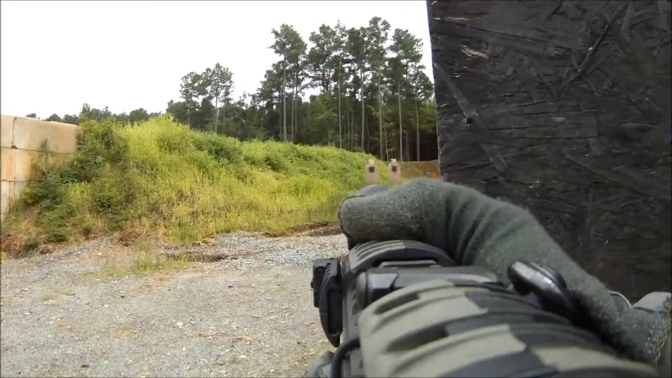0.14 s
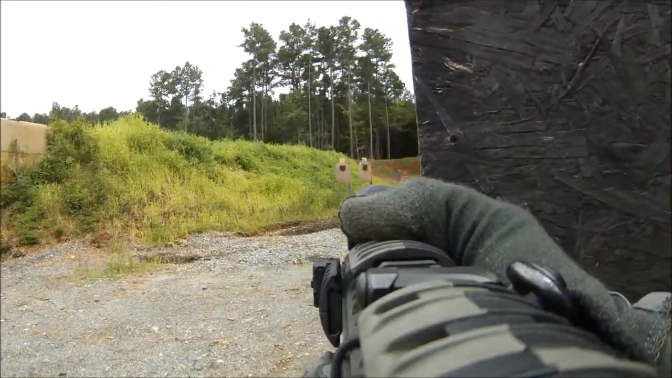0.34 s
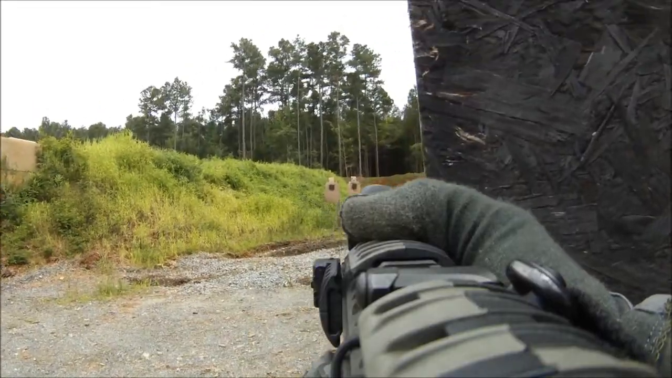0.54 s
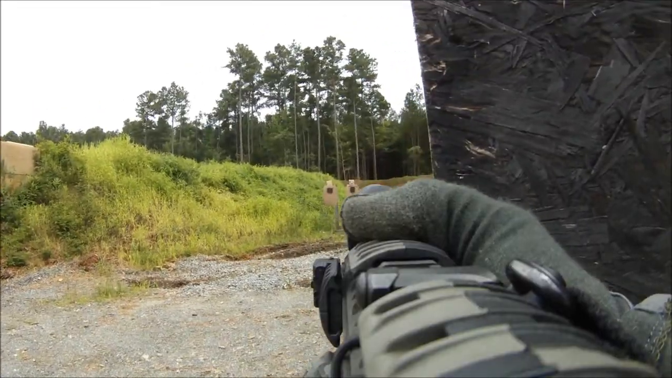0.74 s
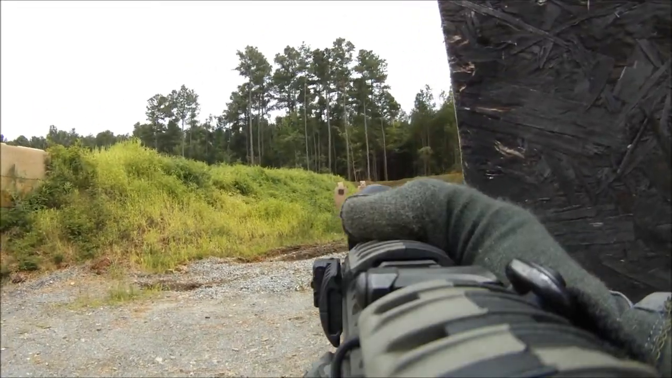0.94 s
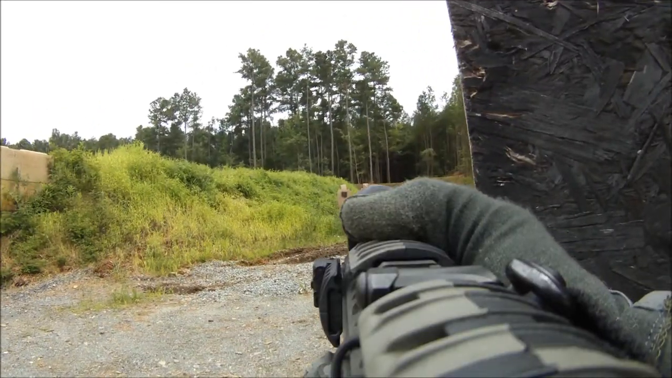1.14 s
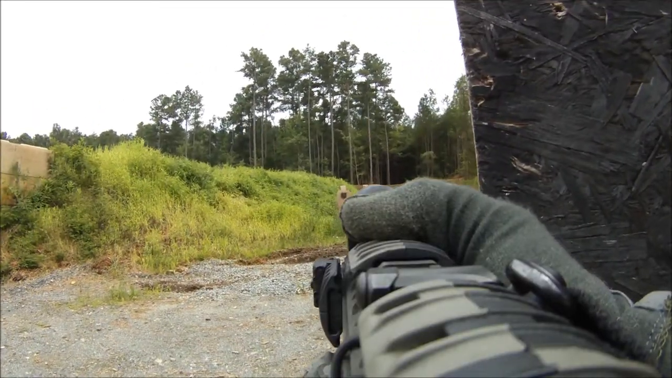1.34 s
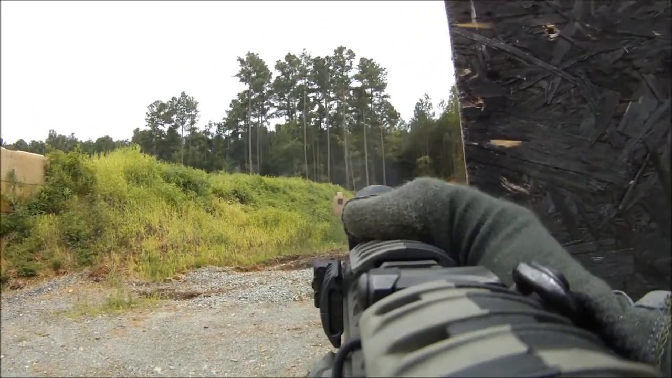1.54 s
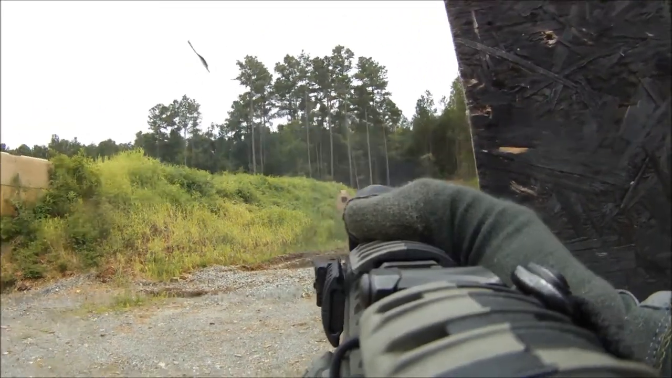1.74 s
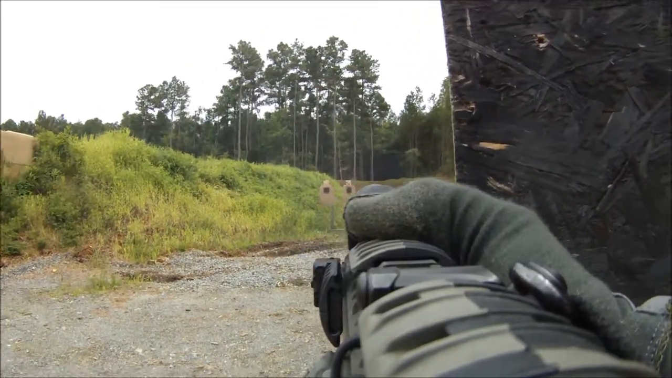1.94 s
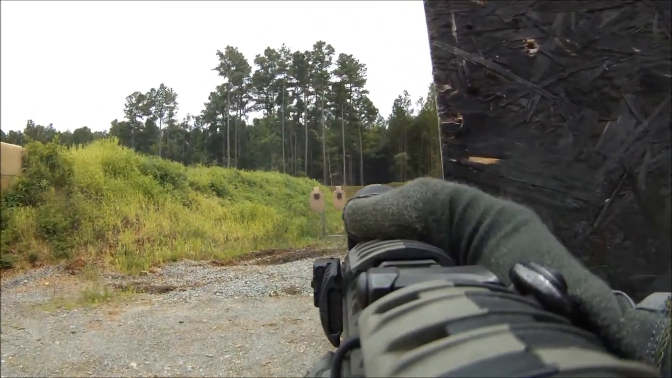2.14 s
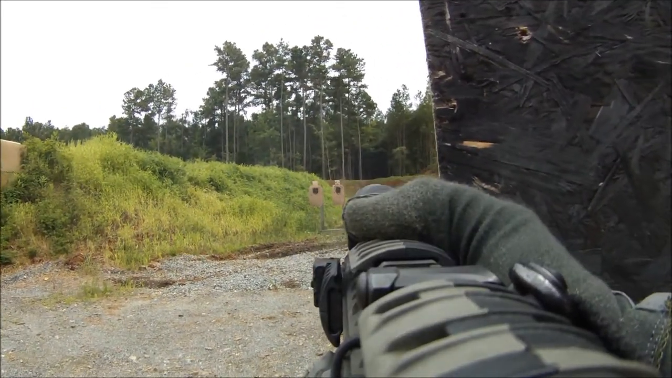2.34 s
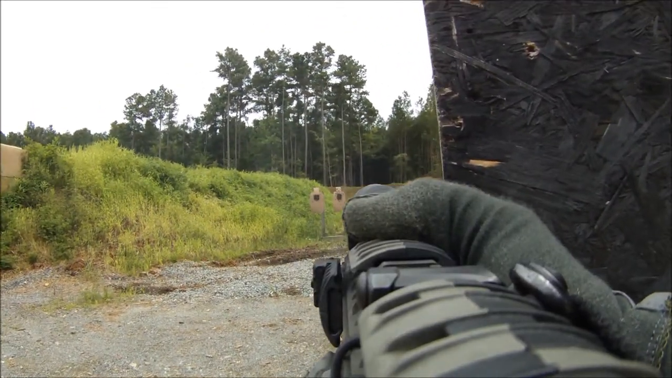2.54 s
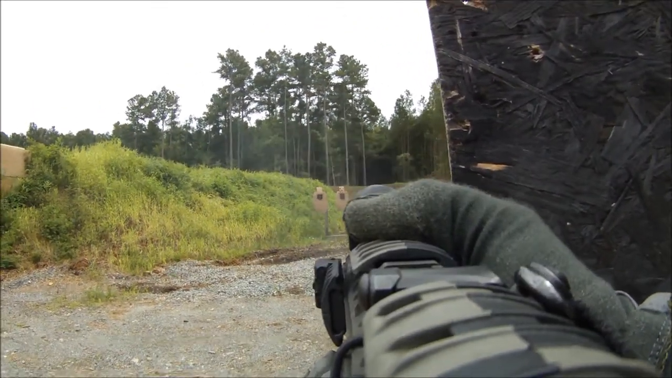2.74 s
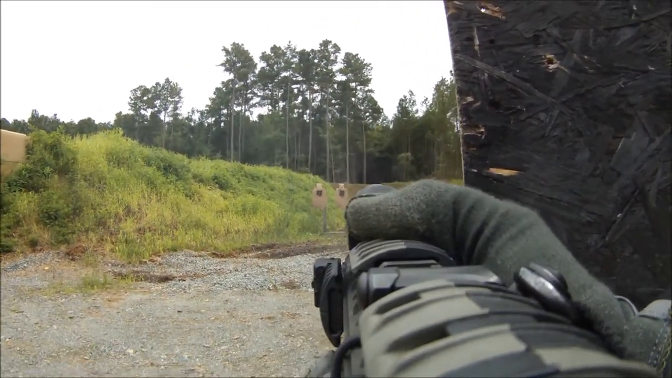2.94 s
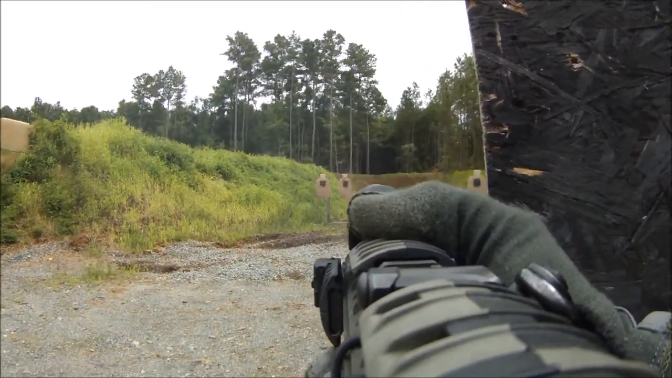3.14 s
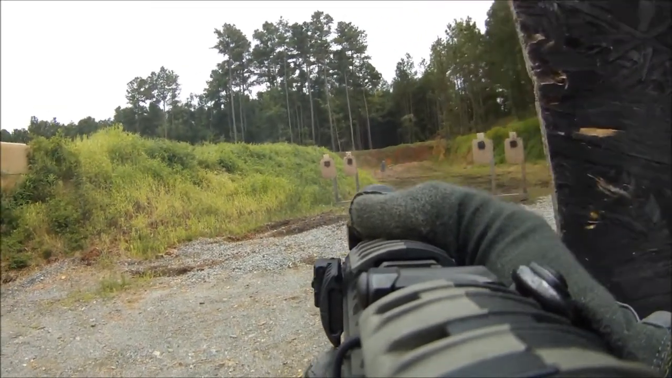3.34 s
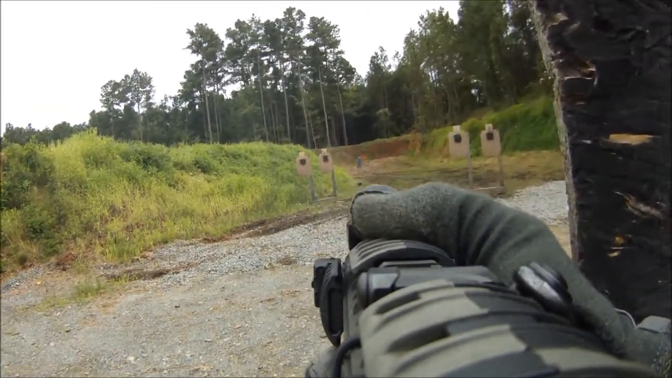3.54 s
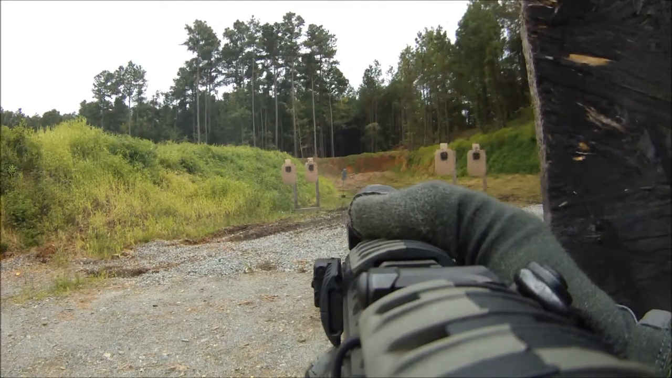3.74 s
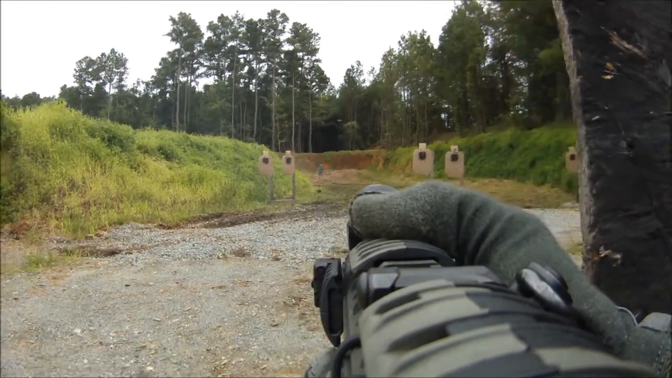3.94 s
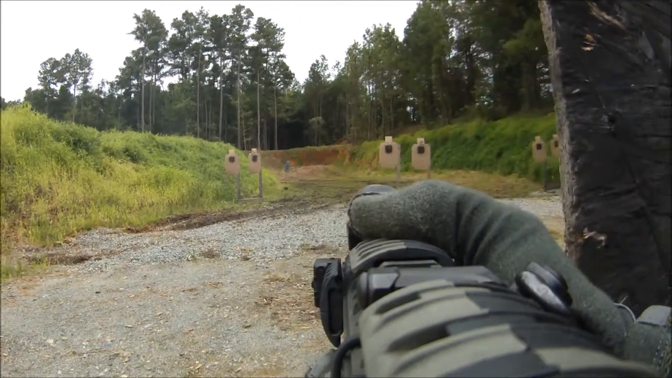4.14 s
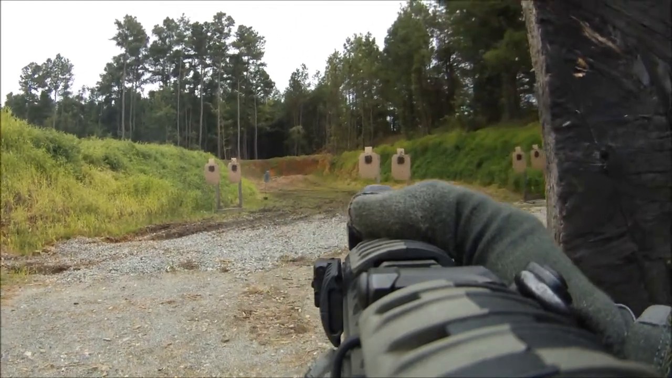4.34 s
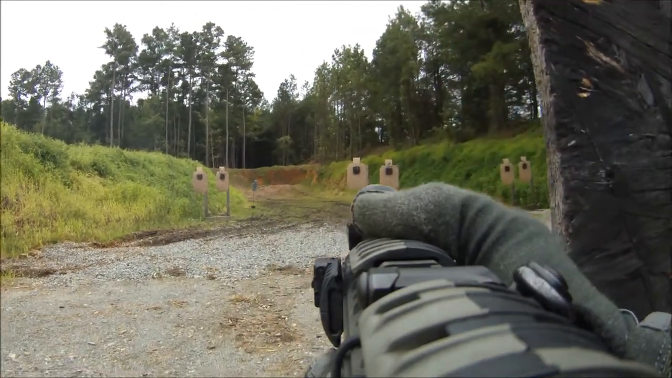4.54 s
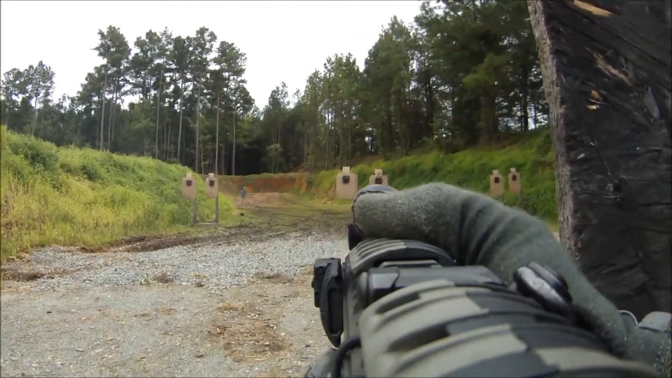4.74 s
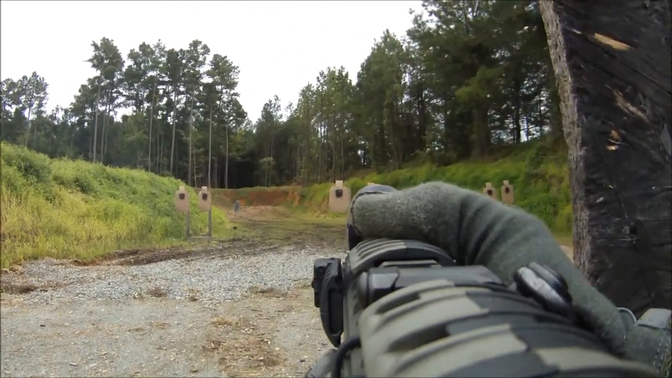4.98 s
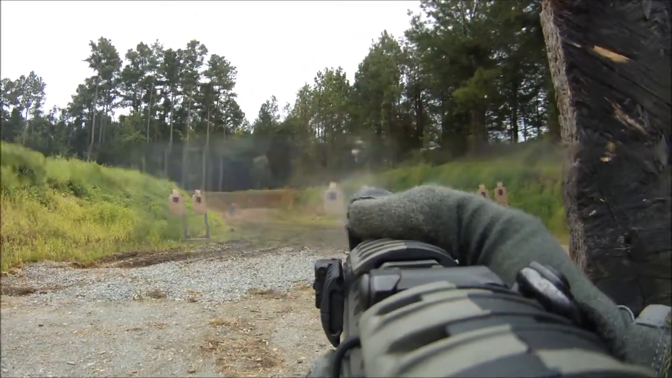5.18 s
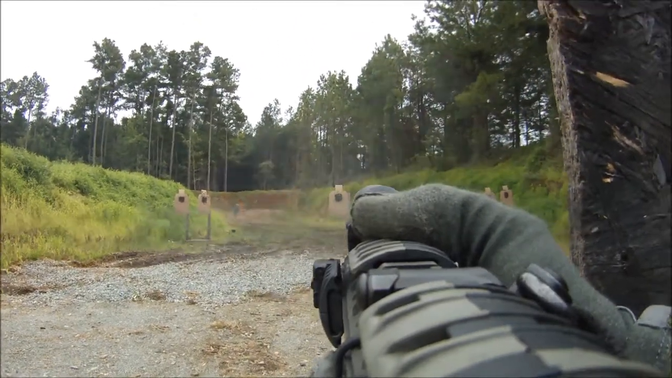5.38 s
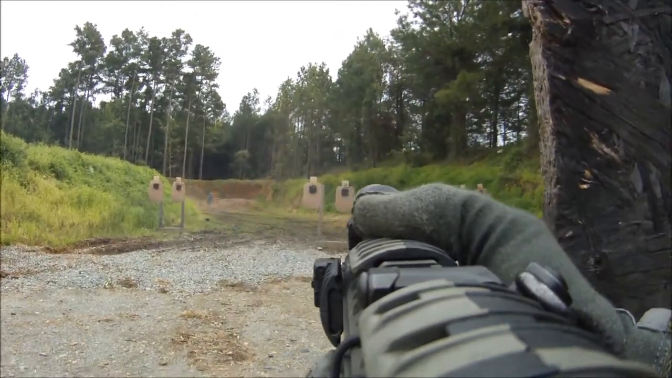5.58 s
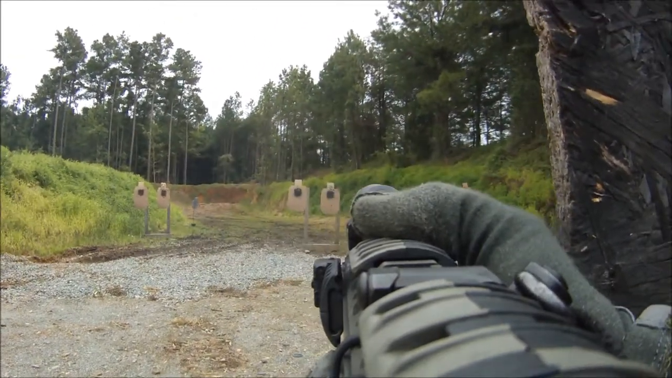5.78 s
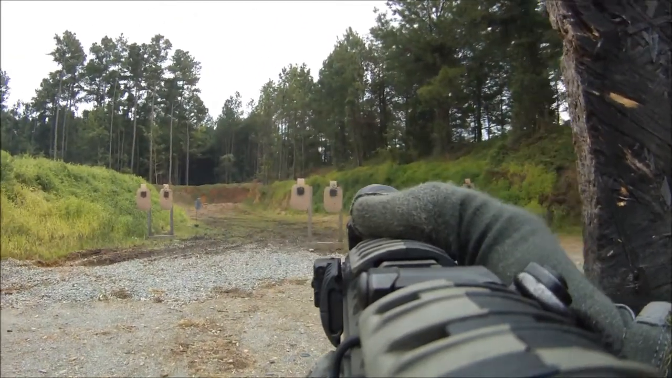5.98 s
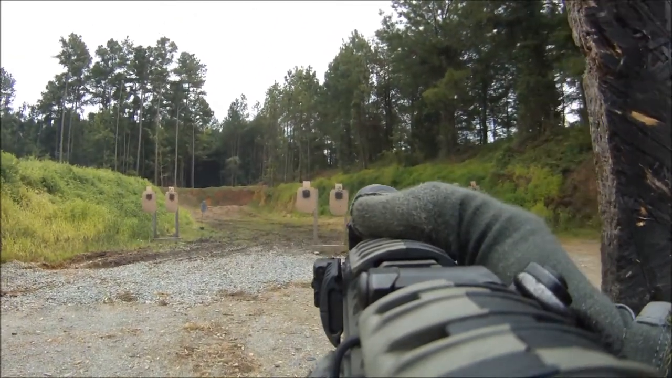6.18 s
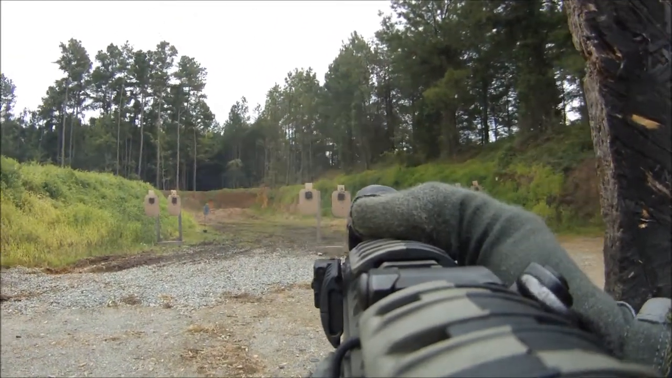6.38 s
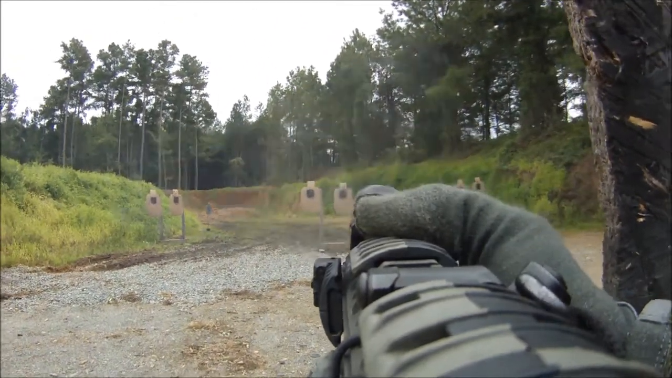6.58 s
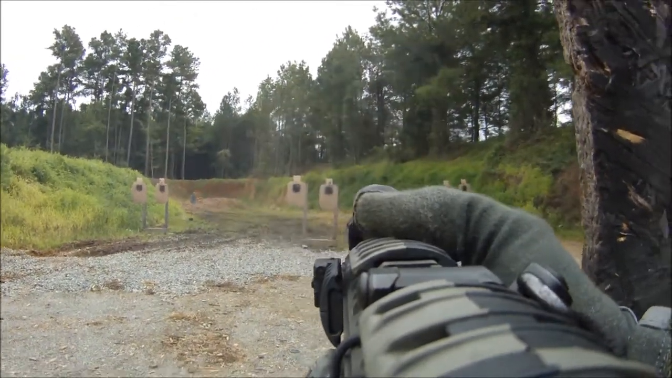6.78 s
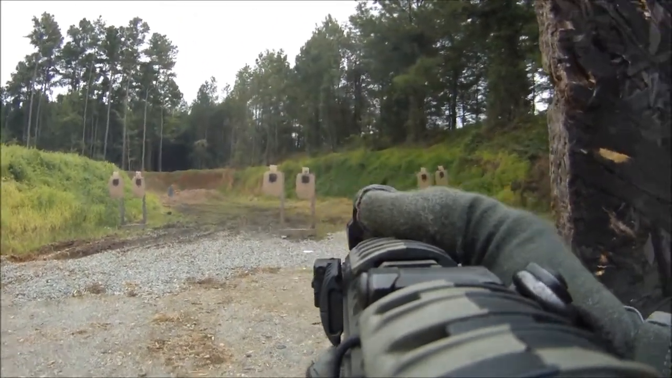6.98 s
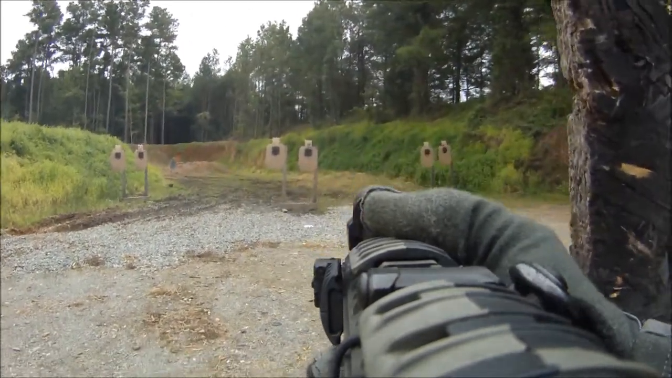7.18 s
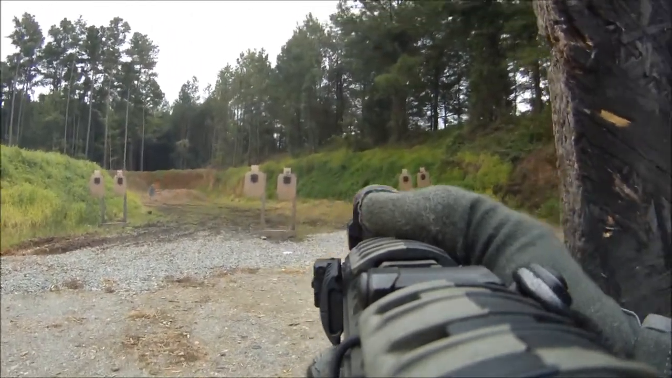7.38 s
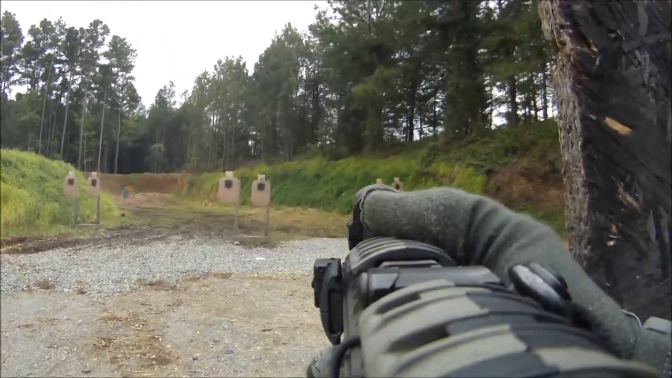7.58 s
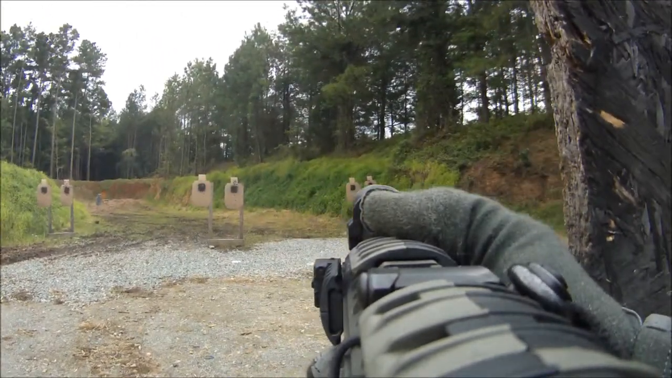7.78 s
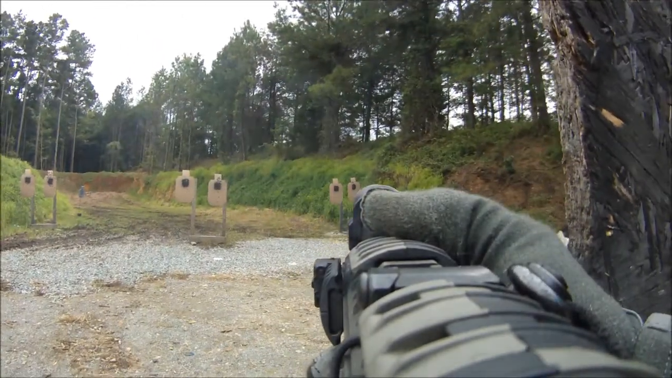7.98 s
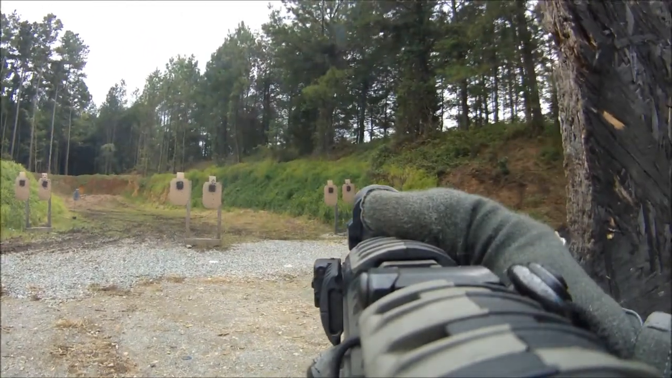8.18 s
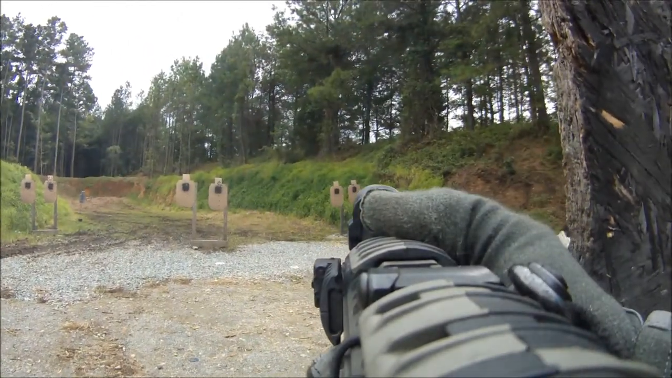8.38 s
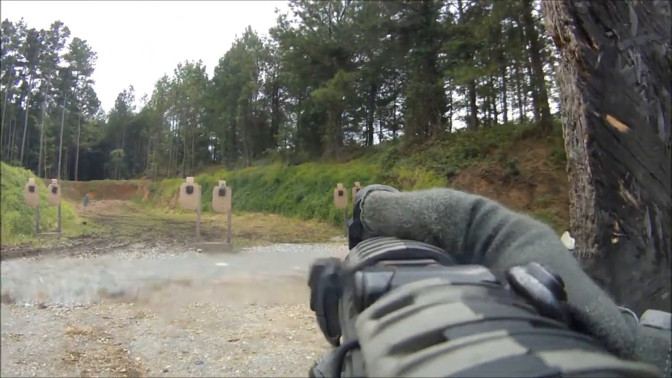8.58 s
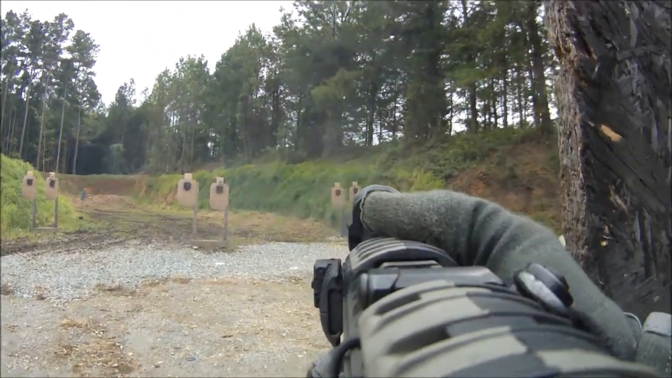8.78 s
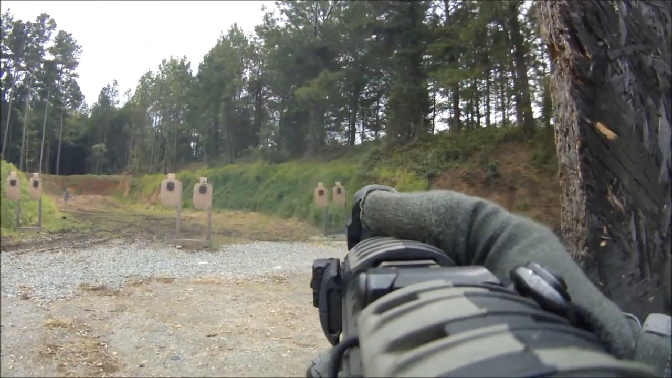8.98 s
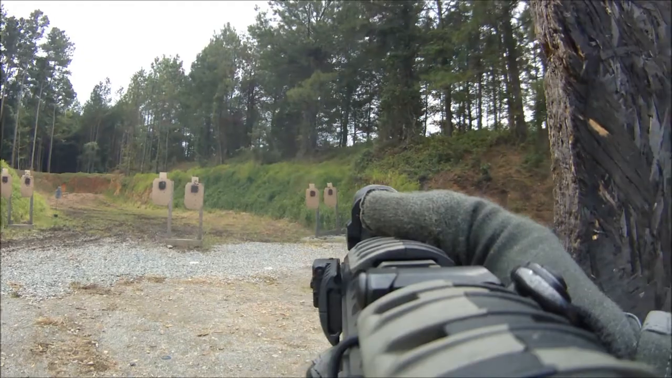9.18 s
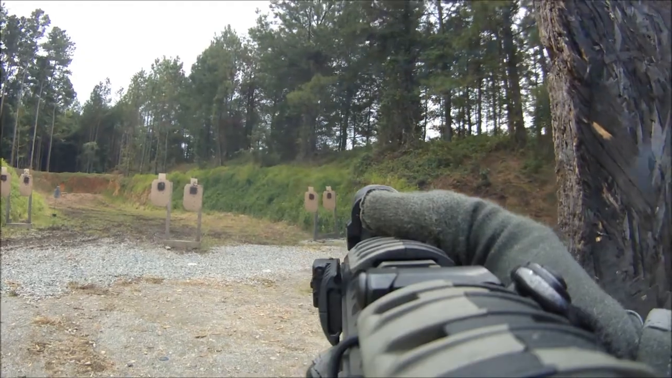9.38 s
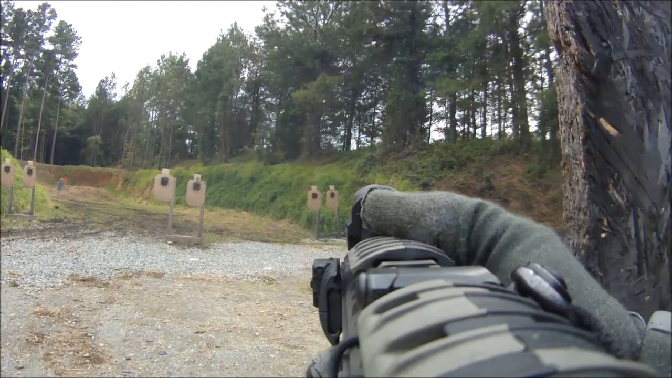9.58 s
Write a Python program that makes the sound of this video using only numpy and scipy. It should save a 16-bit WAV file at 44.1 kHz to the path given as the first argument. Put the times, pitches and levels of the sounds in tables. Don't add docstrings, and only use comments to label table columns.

```python
import sys
import numpy as np
from scipy import signal
from scipy.fft import rfft, irfft, next_fast_len
from scipy.io import wavfile
from scipy.ndimage import uniform_filter1d, minimum_filter1d

SR = 44100
rng = np.random.default_rng(int(sys.argv[2]) if len(sys.argv) > 2 else 0)


def makeup_ratio(level_db):
    decades = np.asarray(level_db, float) / 20
    return 10 ** decades


def to_wav(sig):
    pcm = np.clip(np.atleast_2d(sig), -1, 1) * 32767
    pcm = np.round(pcm).astype(np.int16)
    wavfile.write(sys.argv[1], SR, pcm.T)


N = 424241


def evened(x):
    return x / np.sqrt(np.mean(x ** 2) + 1e-20)


def read(points, hz):
    f, value = np.transpose(points)
    return np.interp(np.log(hz + 1), np.log(f + 1), value)


def level(rows):
    s, db = np.transpose(rows)
    return makeup_ratio(np.interp(np.arange(N) / SR, s, db, -140, -140))


def add(mix, s, sound):
    part = mix[round(s * SR):][:len(sound)]
    part += sound[:len(part)]


def resonate(x, hz, width_hz):
    r = np.exp(-np.pi * width_hz / SR)
    pole = r * np.exp(2j * np.pi * hz / SR)
    return 2 * signal.lfilter([1 - r], [1, -pole], x).real


def puffs(db, layers):
    t, out = np.arange(3800) / SR, 0
    for hz, width_hz, layer_db, rise_s, t60_s in layers:
        decay = makeup_ratio(-60 * np.maximum(t - rise_s, 0) / t60_s)
        shape = np.clip(t / rise_s, 0, 1) ** 2 * decay
        raw = rng.standard_normal(4096)
        band = evened(resonate(resonate(raw, hz, width_hz), hz, 2 * width_hz))
        out = out + makeup_ratio(db + layer_db) * band[-len(t):] * shape
    return out


def modes(table, size):
    t, out = np.arange(size) / SR, 0
    for hz, db, t60_s in table:
        envelope = makeup_ratio(db + 3.0 * rng.standard_normal() - 60 * t / t60_s)
        out = out + envelope * np.sin(2 * np.pi * hz * rng.uniform(0.95, 1.02) * t)
    return out


def noise(gain, patchy_db):
    frames, hz = N // 128 + 5, np.fft.rfftfreq(512, 1 / SR)
    a, b, patches = rng.standard_normal((frames, 257, 3)).T
    patches = evened(uniform_filter1d(uniform_filter1d(patches, 5, 0), 9, 1))
    z = (a + 1j * b) * makeup_ratio(patchy_db * patches)
    z = z * gain(hz[:, None], np.arange(frames) * 128 / SR)
    return signal.istft(z, nperseg=512, noverlap=384)[1][:N] / 25


def toned(x, table):
    size = next_fast_len(N)
    colour = evened(makeup_ratio(read(table, np.fft.rfftfreq(size, 1 / SR))))
    return irfft(rfft(x, size) * colour, size)[:N]


# f/Hz, width/Hz, level/dB, rise/s, t60/s
BLAST = [(6050, 1900, 8, .0003, 0.025), (11000, 12000, -4, 0.00022, 0.013), (2650, 3000, 7, 0.0015, .028),
         (1410, 1200, 3, 0.0079, 0.022), (614, 340, 9, .009, .013), (314, 130, -12, .036, 0.1)]
LEAN_OUT_S = 4.0
SHIELDED_BODY_DB, BODY_TOP_HZ = -3.5, 1000


def blast(s):
    layers = []
    for hz, width_hz, db, rise_s, t60_s in BLAST:
        shielded = s < LEAN_OUT_S and hz < BODY_TOP_HZ
        layers.append((hz, width_hz, db + SHIELDED_BODY_DB * shielded, rise_s, t60_s))
    return layers


# delay/s, level/dB
BARRICADE = [
    (0.0245, -2.5),
    (0.0311, -2.5),
    (.036, -6.5),
]
SHIELDED_DB, SOFT_CRACK_DB = -7.5, -20
WALL_S, WALL_DB, WALL_CRACK_DB = .0433, -3, -3
BERMS_S, BERMS_GAP_S, BERMS_WIDEN, BERMS_DB, BERMS_DB_PER_S = .049, .0068, 1.13, -8, -150


def echoes(s):
    shield_db = SHIELDED_DB * (s < LEAN_OUT_S)
    close = [(delay_s, db + shield_db, SOFT_CRACK_DB) for delay_s, db in BARRICADE]
    wall = [(WALL_S, WALL_DB, WALL_CRACK_DB)]
    later = np.cumsum(BERMS_GAP_S * BERMS_WIDEN ** np.arange(7)) - BERMS_GAP_S
    train = [(BERMS_S + d, BERMS_DB + BERMS_DB_PER_S * d, SOFT_CRACK_DB) for d in later]
    return close + wall + train


# t/s, hammer level/dB, bolt home after/s, bounce after that/s
SHOTS = [
    (1.6064, -6, .0873, .0145),
    (1.7682, -24, .078, .0132),
    (2.7654, -19.5, .0851, .0149),
    (2.9251, -23.5, .0724, .0116),
    (5.2742, -18.5, .0857, .015),
    (5.4136, -23, .0765, 0.014),
    (6.416, -19.5, .0856, .014),
    (6.6075, -27.5, .0701, .014),
    (8.6875, -21, .0813, .0144),
    (8.8299, -25.5, .0724, .013),
]
HAMMER_LEAD_S, BLAST_DB = 0.0046, 0.6
THUMP_HZ, THUMP_DB, THUMP_T60_S, THUMP_RISE_S = 234, -15, .16, .02
ECHO_HZ, ECHO_SPREAD = 590, 0.18


def blasts():
    out, t = np.zeros(N), np.arange(5000) / SR
    colours_hz = ECHO_HZ * (1 + ECHO_SPREAD * rng.uniform(-0.67, 1, size=11))
    thump = makeup_ratio(THUMP_DB - 60 * t / THUMP_T60_S) * np.sin(2 * np.pi * THUMP_HZ * t)
    thump = thump * np.minimum(t / THUMP_RISE_S, 1) * np.linspace(1, 0, len(t))
    ring_shape = (1 - np.exp(-t / 0.00041)) * makeup_ratio(-60 * t / 0.017)
    for s, hammer_db, _, _ in SHOTS:
        hammer = [(3200, 1400, 0, .0008, 0.013), (8900, 1800, -2.6, 0.0012, 0.008)]
        add(out, s - HAMMER_LEAD_S, puffs(hammer_db, hammer))
        add(out, s, puffs(BLAST_DB, blast(s)))
        add(out, s, thump)
        for hz, (delay_s, db, crack_db) in zip(colours_hz, echoes(s)):
            ring = np.sin(2 * np.pi * hz * rng.uniform(0.97, 1.02) * t) * ring_shape
            crack = [(1860, 1300, 1.5, 0.00045, 0.03), (9000, 16000, -13, .0003, .012)]
            add(out, s + delay_s, makeup_ratio(db + 3.0) * ring)
            add(out, s + delay_s, puffs(db + crack_db, crack))
    return out


SLAM_DB, SLAM_HZ, SLAM_S = 0.4, 6380, .0095
BOUNCE_DB, REBOUND_S, REBOUND_DB = 2.5, .0043, -5.5


def bolt():
    out = np.zeros(N)
    for shot_s, _, home_s, bounce_s in SHOTS:
        s = shot_s + home_s
        scrape = puffs(-19.5, [(2800, 1200, 1.0, 0.036, 0.027), (5170, 3500, -3.5, 0.035, .02)])
        chatter = evened(uniform_filter1d(rng.standard_normal(len(scrape)), size=50))
        add(out, s - .04, scrape * makeup_ratio(3.2 * chatter))
        slam = [(SLAM_HZ, 2000, 3, .003, 1.6 * SLAM_S), (12499.5, 5000, -22.5, -0.03, 0.5),
                (3900, 1500, -3, .6 * SLAM_S, .014), (2000, 900, -7, 0.73 * SLAM_S, .014)]
        add(out, s - .001, puffs(SLAM_DB, slam))
        bounce = [(5600, 800, -3.5, .0003, 0.013), (2800, 1100, -10.5, 0.00045, 0.0087),
                  (9900, 12000, -20, .0003, 0.007)]
        add(out, s + bounce_s, puffs(BOUNCE_DB, bounce))
        add(out, s + bounce_s + REBOUND_S, puffs(BOUNCE_DB + REBOUND_DB, bounce))
    return out


def tail(tone, t60s, db, start, rise, patchy_db):
    def gain(hz, t):
        ages_s = t - np.array(SHOTS)[:, :1] - start
        slope_db_per_s = -60 / read(t60s, hz)
        power = 0
        for age_s in ages_s:
            decay = makeup_ratio(slope_db_per_s * np.maximum(age_s, 0))
            power = power + (np.clip(age_s / rise, 0, 1) * decay) ** 2
        return np.sqrt(power)
    return makeup_ratio(db) * toned(noise(gain, patchy_db), tone)


# f/Hz, level/dB per Hz
BERM = [(18, -63), (30, -41), (233, -4), (345, -3.5), (404, -2.5), (499, 1), (780, -1.5), (1430, -11.5),
        (1630, -9), (5590, -23), (14400, -52.5), (16000, -75)]
# f/Hz, t60/s
BERM_T60 = [(60, 0.86), (200, 0.67), (600, 0.55), (3000, 0.66), (8000, .62), (15000, 0.32)]


def berm_tail():
    return tail(BERM, BERM_T60, -12.5, start=0.018, rise=0.0058, patchy_db=2.0)


# f/Hz, level/dB per Hz
WOODS = [(24, -58.5), (40, -29), (150, -11.5), (197, -14), (258, -8.5), (329, -9.5), (381, -6.5), (776, 0),
         (1180, -7), (2070, -8), (3300, -12), (7050, -32), (9010, -39), (11000, -38.5), (14000, -55.5)]
# f/Hz, t60/s
WOODS_T60 = [(100, 1.1), (700, 3.4), (3000, 2.6), (10000, 1.6)]


def woods_tail():
    return tail(WOODS, WOODS_T60, -45.5, start=.05, rise=.1, patchy_db=2.5)


# f/Hz, t60/s
TREELINE_T60 = [(300, 0.7), (3000, .9), (10000, .5)]


def treeline_tail():
    return tail(WOODS, TREELINE_T60, -52, start=0.64, rise=0.074, patchy_db=2.5)


# f/Hz, width/Hz, level/dB
STEEL = [(2810, 210, 0.5), (4300, 510, -5), (1780, 550, -8.5), (449, 620, -16.5)]
# f/Hz, width/Hz, level/dB
STEEL_TOP = [(5806, 1900, -0.5), (8500, 2400, -5), (12100, 2300, -17.5)]
# t/s, peak level/dB
LEVER = [(0.762, -21.5), (0.769, -22), (.7919, -23.5), (.8276, -29), (1.8834, -20.5), (4.5304, -53.5),
         (4.541, -45.5), (4.5454, -51.5), (4.5554, -59), (4.5706, -43), (4.5948, -58), (5.528, -15),
         (6.55, -18.5)]


def lever():
    out = np.zeros(N)
    layers = [(hz, width_hz, g_db, .002, .02) for hz, width_hz, g_db in STEEL[:2] + STEEL_TOP]
    for s, db in LEVER:
        add(out, s - .001, puffs(db - 8.5, layers))
    return out


# t/s, peak level/dB
SNAPS = [
    (.8078, 2),
    (4.58, -18.5),
    (8.2459, -19),
]
# f/Hz, level/dB, t60/s
RING = [(2573, -50.5, .3), (2800, -46.5, 0.22), (3936, -47.5, 0.24), (5750, -47, 0.19), (8750, -47.5, .1),
        (152, -42, 0.27), (62, -49.5, 0.67)]
DETENT_LEAD_S, DETENT_DB, TREBLE_DB = 0.0036, -6.5, -3


def selector():
    out = np.zeros(N)
    low = [(hz, width_hz, g_db, .001, .018) for hz, width_hz, g_db in STEEL]
    top = [(hz, width_hz, g_db, .0006, .015) for hz, width_hz, g_db in STEEL_TOP]
    for s, db in SNAPS + [(s - DETENT_LEAD_S, db + DETENT_DB) for s, db in SNAPS]:
        add(out, s, puffs(db - 9.5, low))
        add(out, s, puffs(db - 9.0 + TREBLE_DB, top))
        ring = modes(RING, size=20000)
        add(out, s, makeup_ratio(db) * ring * np.linspace(1, 0, len(ring)))
    return out


# f/Hz, width/Hz, level/dB, rise/s, t60/s
BRASS = [(2800, 650, -10.5, 0.00078, 0.025), (4320, 450, -12.5, .0005, .018),
         (5600, 630, -14, .0004, 0.021), (8530, 2500, -21, .0003, 0.014)]
# t/s, peak level/dB, tilt/dB per octave (mouth first bright, base first dull)
CASES = [(2.2704, -54, 9), (2.4423, -49, 6), (3.0684, -15, 0), (3.1884, -22, 1.5), (3.4042, -25.5, 4),
         (3.501, -43, 1), (3.6392, -48.5, 0), (4.0178, -39.5, -3), (6.756, -13, 0), (6.867, -23, 5),
         (7.038, -52, 4), (7.0554, -40.5, 3), (7.095, -41, 4), (7.1408, -51, -2), (7.1544, -48, -1),
         (7.2487, -40.5, -10), (7.4291, -54.5, -3.5), (9.027, -40.5, -1)]


def cases():
    out = np.zeros(N)
    for s, db, tilt_db in CASES:
        layers = []
        for hz, width_hz, g_db, rise_s, t60_s in BRASS:
            octaves = np.log2(hz / BRASS[1][0])
            layers.append((hz, width_hz, g_db + tilt_db * octaves, rise_s, t60_s))
        add(out, s, puffs(db, layers))
    return out


# t/s, peak level/dB
TAPS = [(2.6532, -60.5), (7.9464, -57), (8.0094, -55.5), (8.0304, -59.5), (8.0534, -60), (8.0644, -59.5),
        (8.0834, -62), (8.0904, -51), (8.109, -47), (8.1284, -67), (8.1494, -61), (8.1654, -61.5),
        (8.5014, -59), (8.6313, -47)]


def glove():
    out = np.zeros(N)
    for s, db in TAPS:
        add(out, s, puffs(db, [(2083, 950, -7.5, .0006, .014), (3400, 1490, -21, .0005, .01)]))
    return out


def slip_grains():
    strength = makeup_ratio(3.0 * np.minimum(rng.exponential(1, N), 4))
    return strength * (rng.random(N) < 2500 / SR) * rng.standard_normal(N)


# f/Hz, width/Hz, level/dB
GEAR = [(470, 230, -6.5), (1130, 310, 1.5), (2450, 400, -5), (3942, 540, -17)]
# f/Hz, width/Hz, level/dB, rise/s, t60/s
SLIP = [(2500, 1300, -13, .001, .016), (4300, 1500, -21, .001, .012)]
# t/s, peak level/dB
CREAKS = [(0.16, -35), (0.192, -36), (0.305, -33.5), (0.357, -31), (0.387, -28), (0.403, -27),
          (0.413, -17.5), (0.444, -16), (0.468, -12), (0.518, -8.5), (0.54, -14.5), (0.551, -11),
          (1.131, -43.5), (1.164, -44), (1.21, -41), (1.258, -52), (1.301, -46.5), (1.377, -45),
          (1.427, -41), (1.481, -57.5), (1.57, -51)]
# t/s, level/dB
RUB = [(.4, -47), (.47, -31.5), (.525, -26.5), (.56, -40), (.585, -55)]
# t/s, level/dB
RUSTLE = [(.145, -72), (.168, -47), (.25, -58), (.4, -51.5), (.58, -40), (.8, -47.5), (1.22, -60.5),
          (1.32, -71), (1.6, -73)]
# f/Hz, level/dB per Hz
RUSTLE_TONE = [(18, -25.5), (40, 1.5), (92, -3.5), (154, -7), (460, -4), (1110, -3.5), (2310, -9),
               (6000, -24.5), (7500, -31), (15000, -40)]


def gear():
    grains = slip_grains()
    body = 0
    for hz, width_hz, db in GEAR:
        body = body + makeup_ratio(db) * resonate(resonate(grains, hz, width_hz), hz, 3 * width_hz)
    cloth = toned(rng.standard_normal(N), RUSTLE_TONE)
    scratch = evened(resonate(grains, 1600, 1800))
    contact = level(RUB) * (evened(body) + .15 * cloth + 0.4 * scratch)
    creak = [(hz, 1.47 * width_hz, g_db, .0015, .022) for hz, width_hz, g_db in GEAR] + SLIP
    for s, db in CREAKS:
        add(contact, s, puffs(db - 9.5, creak))
    muffled = signal.sosfilt(signal.butter(2, 6000, fs=SR, output="sos"), contact)
    return muffled + level(RUSTLE) * cloth


# t/s, level/dB
GRAVEL = [(0.0, -50), (.11, -34.5), (.142, -41.5)]
# f/Hz, level/dB per Hz
GRAVEL_TONE = [(35, -75.5), (60, -40), (276, -13), (591, -16), (1130, -5.5), (1520, -6.5), (2470, 0.5),
               (5950, -8.5), (15000, -53)]
# t/s, peak level/dB
STONES = [
    (.073, -24.5),
    (.105, -33),
    (.113, -18),
    (.138, -25),
]


def gravel():
    crunch = evened(rng.standard_normal(N) + 0.75 * evened(slip_grains()))
    out = level(GRAVEL) * toned(crunch, GRAVEL_TONE)
    for s, db in STONES:
        add(out, s, puffs(db, [(2450, 900, -9, .0008, 0.013), (5000, 1500, -12.5, 0.00046, .012)]))
    return out


# t/s after start, pitch ratio, level/dB
RISE = [(0, 1, -9), (.066, 1.12, 0), (.092, 1.162, -2), (.1, 1.15, -8)]
FLICK = [(-.035, .68, -9), (-.01, .77, -7), (0, 1, 0), (.015, .86, -1), (.035, .78, -10)]
SWOOP = [(-.013, .915, -3), (0, 1, -1.5), (.012, .81, 1), (.046, .545, -3)]
HOOK = [(-.022, .936, -5), (0, 1, -1), (.013, .92, 1), (.022, .81, 1)]
# shape, t/s, f/Hz, level/dB
NOTES = [
    (RISE, .99, 5720, -67),
    (FLICK, 1.131, 5500, -63),
    (RISE, 1.245, 5585, -63),
    (FLICK, 1.39, 5550, -61.5),
    (HOOK, 1.527, 7800, -72),
    (SWOOP, 1.554, 6450, -63.5),
]


def bird():
    out = np.zeros(N)
    for shape, start_s, note_hz, note_db in NOTES:
        s, ratio, db = np.transpose(shape)
        t = np.arange(s[0], s[-1], 1 / SR)
        flutter_db = 2.8 * evened(uniform_filter1d(rng.standard_normal(len(t)), 200))
        phase = 2 * np.pi * np.cumsum(note_hz * np.interp(t, s, ratio)) / SR
        note = np.sin(phase) * signal.windows.tukey(len(t), .3)
        add(out, start_s + s[0], np.sqrt(2) * makeup_ratio(note_db + np.interp(t, s, db) + flutter_db) * note)
    return out


# t/s, length/s, level/dB
INSECT = [
    (3.9, .28, -81),
    (7.499, 0.26, -83),
]
INSECT_HZ, INSECT_FADE_S = 4500, .08


def insect():
    t, swell = np.arange(N) / SR, 0
    for s, length_s, db in INSECT:
        edge_s = np.minimum(t - s, s + length_s - t)
        swell = swell + makeup_ratio(db) * np.clip(edge_s / INSECT_FADE_S, 0, 1)
    fuzz = resonate(rng.standard_normal(N), INSECT_HZ, 350)
    return swell * evened(resonate(fuzz, INSECT_HZ, 500))


# f/Hz, level/dB per Hz
AIR = [(15, -20.5), (50, -4), (212, -6), (300, -1.5), (600, -1.5), (818, -7.5), (1370, -13), (4000, -22),
       (7000, -32.5), (16000, -52)]
# t/s, level/dB
AIR_DB = [(0, -66.5), (4.3, -68.5), (4.8, -66), (5.2, -73), (7.9, -68.5), (8.5, -75.5), (9.6, -76.5)]


def air():
    return level(AIR_DB) * toned(evened(noise(lambda hz, t: 1, 2.3)), AIR)


# f/Hz, level/dB per Hz
HISS = [(2000, -30), (6000, -6), (7000, -3.5), (7500, 2), (8000, -6.5), (12500, -9), (15000, -19.5)]
# t/s, level/dB
HISS_DB = [(.145, -72), (1.6, -76), (1.62, -92), (9.62, -90.5)]


def hiss():
    return level(HISS_DB) * toned(rng.standard_normal(N), HISS)


def scene():
    shots = blasts() + bolt() + berm_tail() + woods_tail() + treeline_tail()
    handling = lever() + selector() + cases() + glove() + gear() + gravel()
    mono = shots + handling + bird() + insect() + air() + hiss()
    return np.array([mono, mono])


def top_cut(x):
    return signal.sosfilt(signal.butter(12, 16280, fs=SR, output="sos"), x)


SIDE_DB = -39


def record(dry):
    peak = uniform_filter1d(-minimum_filter1d(-abs(dry), size=31, axis=1), size=21, axis=1)
    held = 1.164 * np.tanh(dry / np.maximum(peak, 1) ** 0.53 / 1.194)
    high = signal.sosfilt(signal.butter(2, 125, "high", fs=SR, output="sos"), held)
    held = np.clip(high + makeup_ratio(-15.5) * held, -.9, .9)
    held = signal.sosfilt(signal.butter(12, 15300, fs=SR, output="sos"), held)
    signs = rng.choice([-1., 1.], N // 64 + 1).repeat(64)[:N]
    trace = held[0] * uniform_filter1d(signs, size=24)
    trace = signal.sosfilt(signal.butter(2, 120, "high", fs=SR, output="sos"), trace)
    return top_cut(held + makeup_ratio(SIDE_DB) * np.array([trace, -trace]))


dry = scene()
out = record(dry)
to_wav(out)
```